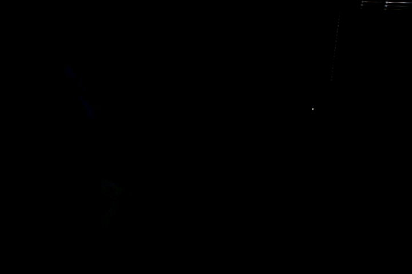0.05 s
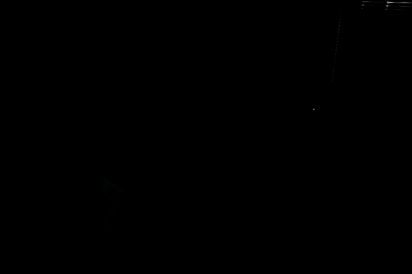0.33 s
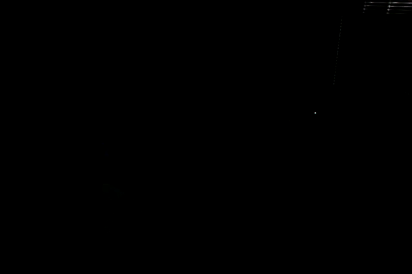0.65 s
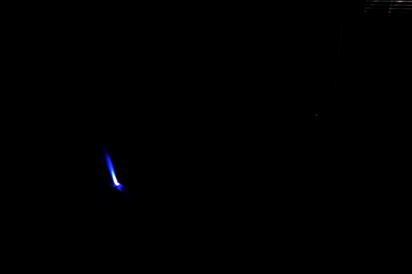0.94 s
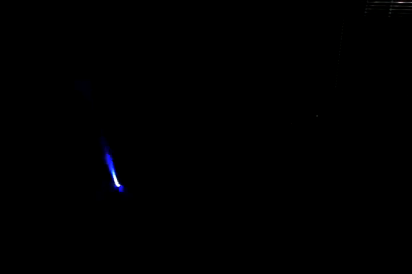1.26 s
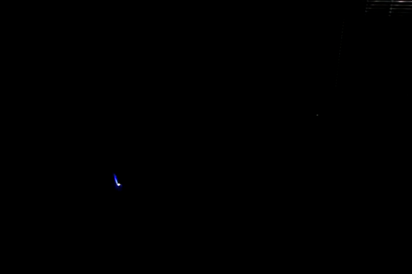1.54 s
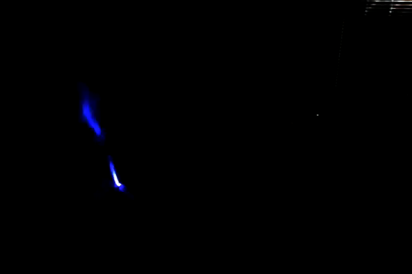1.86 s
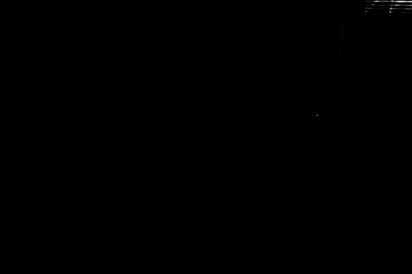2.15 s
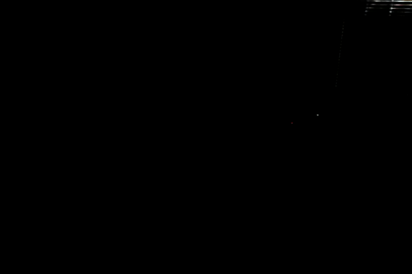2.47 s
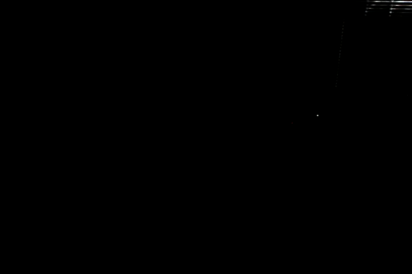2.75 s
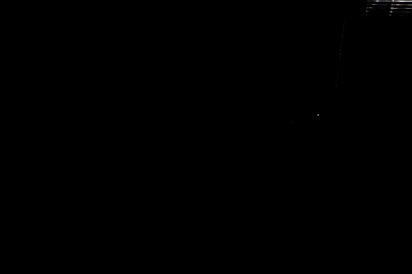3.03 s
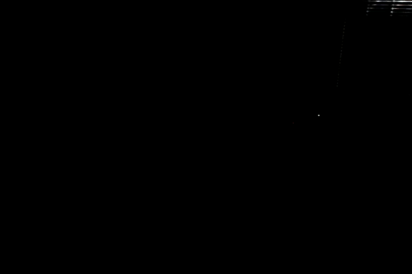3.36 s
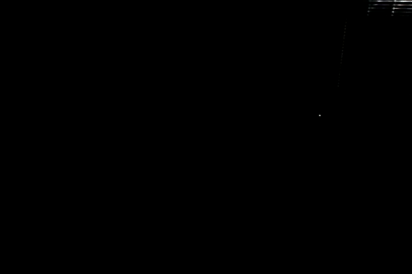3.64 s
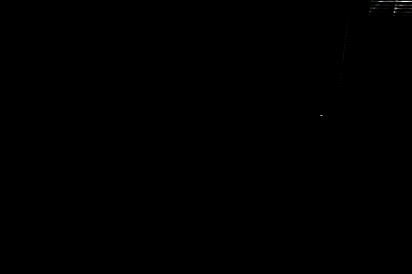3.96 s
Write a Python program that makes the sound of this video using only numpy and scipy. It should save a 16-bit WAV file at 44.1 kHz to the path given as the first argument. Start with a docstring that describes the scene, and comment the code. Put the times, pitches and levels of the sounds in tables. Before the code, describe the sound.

A burning gas jet hisses loudly in four bursts, each just under half a second, starting at about 0, 0.7, 1.2 and 1.9 seconds. Each spits open, then throbs about ten times a second, bright and slightly ringing, with a softer flame roar underneath and a short hall echo. After about 2.5 seconds only a faint ventilation hum remains, with one dull, distant knock near 3.8 seconds.

```python
"""Four bright, hissing bursts, each throbbing about ten times a second, ring out in a large hall.
They are burning jets from a gas purge nozzle: each spits as the valve opens, then rushes on,
coloured by narrow ringing peaks, with the roar of the flame under it. Ventilation hums behind,
and near the end something knocks once, far off. One microphone hears it all."""
import sys
import numpy as np
from scipy import signal
from scipy.fft import rfft, irfft
from scipy.io import wavfile

SR = 44100
rng = np.random.default_rng(int(sys.argv[2]) if len(sys.argv) > 2 else 0)


def store_pcm(level_fs):
    """Save levels as 16-bit WAV."""
    pcm = np.round(np.clip(level_fs, -1, 1) * 32767).astype(np.int16)
    wavfile.write(sys.argv[1], SR, np.atleast_2d(pcm).T)


N = 176400
TIME = np.arange(N) / SR
FREQS = np.fft.rfftfreq(N, 1 / SR)


def from_db(db):
    """Decibels to gain."""
    return 10 ** (np.asarray(db) / 20)


def rms_one(x):
    """Scale to unit rms."""
    return x / np.sqrt(np.mean(x ** 2) + 1e-20)


def noise(colour):
    """Steady noise, rms 1, shaped by an EQ curve of relative levels on a log-frequency axis."""
    hz, db = np.transpose(colour)
    curve_db = np.interp(np.log(np.maximum(FREQS, 1)), np.log(hz), db)
    return rms_one(irfft(rfft(rng.standard_normal(N)) * from_db(curve_db), N))


def narrow_noise(hz, width_hz):
    """Noise in one steep-sided band, rms 1; at 0 Hz it is a random wander."""
    offset = (FREQS - hz) / width_hz
    return rms_one(irfft(rfft(rng.standard_normal(N)) / (1 + 2 * offset ** 2), N))


# Colour of the moving air: (f/Hz, level/dB)
AIR_COLOUR = [(25, -42), (50, -21), (75, -22.5), (112, -3.5), (150, -4), (210, -1.5), (310, -5), (450, -7),
              (640, -6), (1100, -8), (1600, -12), (2100, -13.5), (2800, -20.5), (4200, -19.5), (5200, -25),
              (6700, -19.5), (7400, -33), (8000, -51), (9000, -60)]
# Fan tones: (f/Hz, level/dB)
FAN_TONES = [(122, -77), (197, -69.5), (371.4, -73), (624.8, -73.5), (1004.7, -73)]

def ventilation():
    """The bed: soft air noise with a few wavering fan tones."""
    hum = sum(from_db(db) * narrow_noise(hz, width_hz=6.4) for hz, db in FAN_TONES)
    return from_db(-57) * noise(AIR_COLOUR) + hum


# Reverb time of the hall by band: (f/Hz, t60/s)
HALL_DECAY = [(150, 0.96), (500, 0.56), (1200, 0.77), (2200, 0.76), (4200, 0.61), (6500, 0.47),
              (9000, 0.42)]

def hall_response(predelay_s=0.0015, build_s=0.012):
    """Dense echoes swell and die away, the treble first; unit energy."""
    t, hz = TIME[:SR], np.fft.rfftfreq(SR, 1 / SR)
    white = rfft(rng.standard_normal(SR))
    centres, t60s = np.transpose(HALL_DECAY)
    tail = 0
    for share, t60 in zip(np.eye(len(centres)), t60s):
        band = irfft(white * np.interp(hz, centres, share), SR)   # crossfades into its neighbours
        tail = tail + band * np.exp(-np.log(1000) * t / t60)
    swell = 1 - np.exp(-np.maximum(t - predelay_s, 0) / build_s)
    return rms_one(tail * swell) / np.sqrt(SR)


# Colour of the far knock: (f/Hz, level/dB)
KNOCK_COLOUR = [(150, -32), (400, 2.5), (650, -1), (1000, -0.5), (1750, -0.5), (2650, -6), (3300, -6.5),
                (4500, -21), (6300, -15.5), (7200, -27), (8000, -50), (9000, -62)]

def knock(at_s=3.7555, lead_s=0.0086, decay_s=0.01):
    """A light first touch runs into a short, dull crack."""
    envelope = 0
    for start, db in [(at_s - lead_s, -12), (at_s, 0)]:
        age = np.maximum(TIME - start, 0)
        envelope = envelope + from_db(db) * (TIME >= start) * np.exp(-age / decay_s)
    return from_db(-38.5) * envelope * noise(KNOCK_COLOUR)


# Valve openings: (start t/s, length/s, level/dB, throb period/s, base throb depth/dB)
BURSTS = [(0.046, 0.36, 1, 0.11, 2.5), (0.721, 0.4, 1, 0.1023, 2.5), (1.244, 0.47, 0.5, 0.1035, 2.5),
          (1.871, 0.47, 1, .101, 2)]

def flow(throb_scale, attack_s, release_s, first_crest_s=0.049, build_db_per_s=1):
    """Envelope of the gas flow: it opens, throbs and builds, then shuts. Each layer scales the throb."""
    envelope = 0
    for start, length, db, period, depth_db in BURSTS:
        age = np.maximum(TIME - start, 0)
        held = np.minimum(age, length)
        gate = (1 - np.exp(-age / attack_s)) * np.exp(-(age - held) / release_s)
        throb_db = throb_scale * depth_db * np.cos(2 * np.pi * (held - first_crest_s) / period)
        build_db = build_db_per_s * (held - length / 2)
        envelope = envelope + gate * from_db(db + throb_db + build_db)
    return envelope


# Colour of the flame's roar: (f/Hz, level/dB)
ROAR_COLOUR = [(30, -58), (70, -28), (120, -15.5), (160, 3), (210, 1), (300, -1), (420, 0.5), (600, 7.5),
               (900, 5.5), (1500, -14), (4000, -46.5)]

def flame(flutter_db=3.5, low_cut_hz=90):
    """The low layer: burning gas roars and flutters while it is fed. A small flame has no deep bass."""
    flutter = from_db(flutter_db * narrow_noise(0, width_hz=65))
    envelope = flow(throb_scale=0.3, attack_s=0.004, release_s=0.0085)
    roar = from_db(-45) * noise(ROAR_COLOUR) * flutter * envelope
    return signal.sosfilt(signal.butter(2, low_cut_hz, "high", fs=SR, output="sos"), roar)


# Colour of turbulent gas, for both spit and rush: (f/Hz, level/dB)
RUSH_COLOUR = [(80, -52), (200, -42), (450, -11), (700, -15), (1000, -6), (1350, -5), (1650, -4),
               (1900, -1), (2170, -1.5), (2400, -7), (2800, -7.5), (3300, -6), (4150, -2.5), (5000, -9.5),
               (6800, -8.5), (8000, -39.5)]

def spit(hold_s=0.0035, decay_s=0.006):
    """The transient: gas trapped behind the valve spits out at each opening."""
    puffs = 0
    for start, *_ in BURSTS:
        fading = np.maximum(TIME - start - hold_s, 0)
        puffs = puffs + (TIME >= start) * np.exp(-fading / decay_s)
    return from_db(-41) * puffs * noise(RUSH_COLOUR)


def rush():
    """Turbulence gives the jet its broad, noisy body."""
    return from_db(-31.5) * noise(RUSH_COLOUR)


# Narrow peaks in the hiss: (f/Hz, width/Hz, relative level/dB)
PEAKS = [(653, 90, -50), (737, 70, -51), (1828, 53, -50.5), (2140, 45, -46.5), (3740, 33, -51),
         (4226, 20, -50.5), (5475, 19, -44), (5720, 55, -41.5), (6300, 60, -42.5), (6310, 53, -41),
         (6690, 40, -42), (6780, 16, -42), (6750, 14, -47)]

def ringing_peaks(trim_db=-1.5):
    """Narrow ringing peaks colour the hiss."""
    return sum(from_db(db + trim_db) * narrow_noise(hz, width) for hz, width, db in PEAKS)


# Colour of the high hiss at the nozzle: (f/Hz, level/dB)
HISS_COLOUR = [(2500, -40), (3600, -20.5), (4300, -10.5), (5000, -9), (5600, -5.5), (6200, -1), (6600, 0.5),
               (7020, -1.5), (7450, -16), (8000, -31.5), (8800, -34), (9300, -51.5)]

def jet(roughness_db=0.27):
    """The lead: nozzle hiss throbs hardest, over rush and peaks; a fine grain roughens all three."""
    hiss = from_db(-28.5) * noise(HISS_COLOUR)
    top = hiss * flow(throb_scale=1.25, attack_s=0.0088, release_s=0.016)
    body = (rush() + ringing_peaks()) * flow(throb_scale=0.79, attack_s=0.0069, release_s=0.021)
    grain = from_db(roughness_db * narrow_noise(0, width_hz=72))
    return (top + body) * grain


def scene():
    """Knock, flame and jet each feed the hall reverb, over the ventilation; both channels alike."""
    bump, fire, gas = knock(), flame(), spit() + jet()
    send = from_db(-0.9) * bump + from_db(-7.5) * fire + from_db(-3.5) * gas
    reverb = signal.fftconvolve(send, hall_response())[:N]
    mix = ventilation() + from_db(-2.5) * (bump + fire + gas + reverb)
    return np.tile(mix, (2, 1))


def record(dry, low_cut_hz=61, high_cut_hz=9100):
    """The microphone drops the deep bass; the top is cut steeply."""
    thin = signal.sosfilt(signal.butter(4, low_cut_hz, "high", fs=SR, output="sos"), dry)
    return signal.sosfilt(signal.ellip(14, 0.1, 80, high_cut_hz, fs=SR, output="sos"), thin)


dry = scene()
out = record(dry)
store_pcm(out)
```